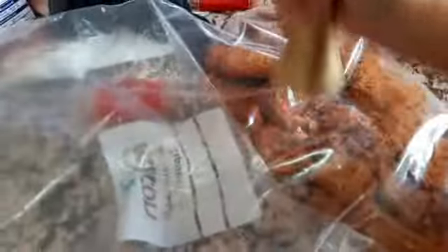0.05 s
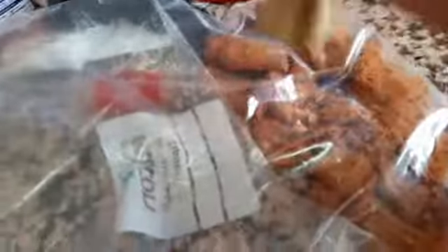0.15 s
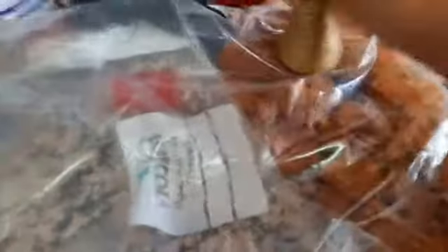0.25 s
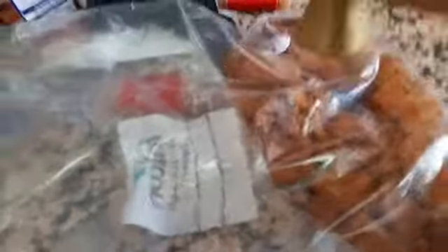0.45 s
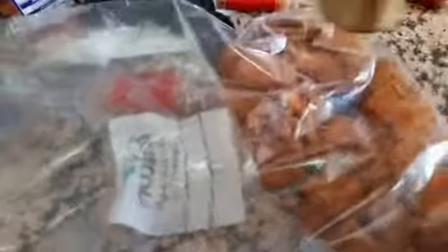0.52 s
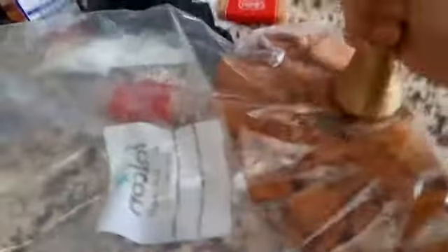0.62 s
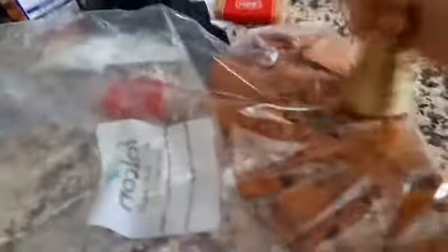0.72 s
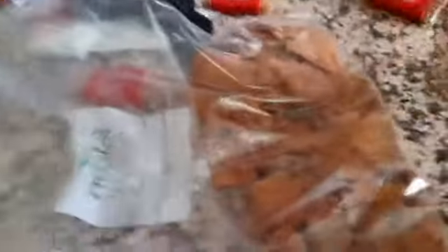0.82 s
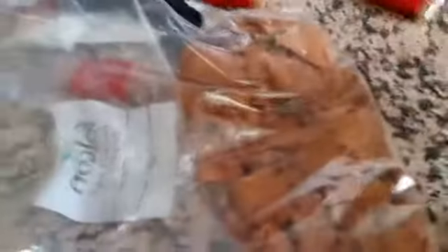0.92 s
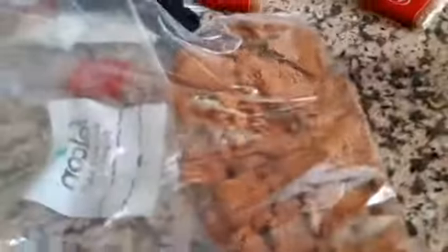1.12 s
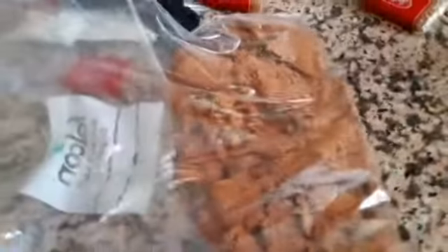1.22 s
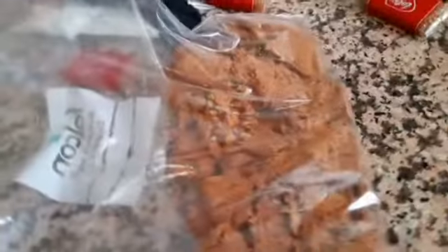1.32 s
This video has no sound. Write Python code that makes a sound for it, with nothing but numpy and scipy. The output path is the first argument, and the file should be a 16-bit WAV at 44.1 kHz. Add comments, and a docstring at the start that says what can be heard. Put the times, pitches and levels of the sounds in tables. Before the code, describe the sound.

Two quick crunching thuds sound close up as a wooden pestle breaks bagged biscuits on a kitchen counter. The plastic rustles softly after each hit and settles into faint ticks, with slight room echo and a low hum.

```python
"""A wooden pestle pounds biscuits in a plastic bag on a kitchen counter, twice.
Each blow is a swelling crunch of tiny fractures and a few hard snaps, both ringing the wood,
then the thud of the counter's low modes. The bag crinkles as its creases flip and it relaxes.
A small kitchen echoes and drones behind it."""
import sys
import numpy as np
from scipy import signal
from scipy.fft import rfft, irfft
from scipy.io import wavfile

SR = 44100
rng = np.random.default_rng(int(sys.argv[2]) if len(sys.argv) > 2 else 0)


def unload_audio(sound):
    """Save the sound as a 16-bit wav file, at the path given as the first command line argument."""
    columns = np.transpose(np.atleast_2d(sound))
    # keep every value between -1 and 1, then stretch to whole-number steps
    steps = np.round(np.clip(columns, -1, 1) * 32767)
    wavfile.write(sys.argv[1], SR, steps.astype(np.int16))


N = 59535
T, HZ = np.arange(N) / SR, np.fft.rfftfreq(2 * N, 1 / SR)

# pestle and worktop modes: pitch_hz, level_db, t60_s
WOOD_MODES = [(213, -18, 0.15), (407, -24.5, 0.07), (590, -19, 0.048), (836, -21, 0.042),
              (954, -13.5, 0.056), (1403.5, -31, 0.045), (1758, -15.5, 0.017), (1824, -18.5, 0.029),
              (1970, -25, .07), (2067, -13.5, 0.039), (2876, -23.5, 0.077), (3306, -22, 0.086)]
# plastic bag spectrum: freq_hz, density_db
BAG_SPECTRUM = [(200, -14.5), (800, 4), (1400, 0), (2300, 3), (3300, -2), (4500, -5), (6500, -9.5),
                (9000, -11.5), (13000, -10), (14500, -13), (16000, -17)]


def crunches(grains_per_s=3500, spread_db=5, swell_db=31, swell_power=2.44, release_db_per_s=997):
    """Fractures swell as the pestle sinks in, die once it stops, and ring the wood."""
    # pestle blows: peak_s, crush_s, level_db, treble_db, treble_pan_db, wood_db
    blows = [(.226, 0.02, -21, 1, 4, -8.5), (.594, 0.015, -25, 4.5, 14.5, -8)]
    # breaking biscuit spectrum: freq_hz, density_db
    spectrum = [(100, -6), (200, 4), (400, 3), (650, -1.5), (1000, 1), (1900, 2), (2700, -5.5), (4200, -8),
                (6000, -6.5), (9000, -10), (12000, -6.5), (16000, -13)]
    # left-right likeness: freq_hz, correlation
    likeness = [(100, .99), (300, 0.98), (600, 0.41), (1000, 0.54), (1800, 0.45), (3500, 0.055),
                (14000, 0.063)]
    wood = ring(WOOD_MODES, 0)
    wood /= np.linalg.norm(wood)
    pan_band = np.clip((HZ - 6500) / 3000, 0, 1)
    out = np.zeros((2, N))
    for peak_s, crush_s, level_db, treble_db, treble_pan_db, wood_db in blows:
        rise_db = -swell_db * np.clip((peak_s - T) / crush_s, 0, 2) ** swell_power
        fall_db = -release_db_per_s * np.maximum(T - peak_s, 0)
        envelope = amp(level_db + rise_db + fall_db) * (T > peak_s - crush_s)
        fractures = correlate(grains(grains_per_s, spread_db) * envelope, likeness)
        ringing = signal.fftconvolve(fractures, wood[None], axes=1)[:, :N]
        biscuit = colour(fractures, curve(spectrum) + shelf_db(treble_db))
        out += equalise(biscuit + amp(wood_db) * ringing, stereo_db(treble_pan_db * pan_band))
    return out


def snaps(t60_cycles=8.2, tick_db=-5.5, tick_decay_s=.0005):
    """Biscuits snap and one piece falls: short pitched cracks with a sharp tick ring the wood."""
    # cracks: start_s, level_db, pitch_hz, wood_db
    cracks = [(0.2155, -27, 1780, -20), (.2216, -18, 1160, -6), (.2266, -10.5, 1560, -9),
              (.2297, -15.5, 2350, -2), (.5948, -14.5, 2170, -12.5), (.6005, -20, 1960, -3),
              (0.708, -30.5, 2530, -7)]
    # crack edge spectrum: freq_hz, density_db
    tick_spectrum = [(300, -3), (1000, 0.5), (3000, -1.5), (5500, -7.5), (9000, -15), (16000, -12.5)]
    out = np.zeros((2, N))
    for start_s, level_db, pitch_hz, wood_db in cracks:
        crack = ring([(pitch_hz, 0, t60_cycles / pitch_hz)], start_s)
        tick = amp(tick_db) * colour(burst(start_s, tick_decay_s), curve(tick_spectrum))
        wood = amp(wood_db) * ring(WOOD_MODES, start_s)
        out += amp(level_db) * (crack + tick + wood)
    return out


def thuds(rise_s=.015, knock_hz=300.4, knock_t60_s=.16):
    """Soft pushes knock on the worktop and slowly rock the heavy counter; a longer push is duller."""
    # counter jolts: start_s, swing_db, push_s, knock_db
    jolts = [(.001, -23, 0.0029, -61), (0.2307, -5.5, 0.0011, -30.5), (0.599, -4.5, 0.01, -28.5),
             (0.668, -19.5, 0.0025, -40)]
    # counter and cabinet modes: pitch_hz, level_db, t60_s
    counter_modes = [(51.04, -24.5, 0.62), (70.5, 5, 0.055), (93, -14.5, .2), (109.9, -6.5, 0.18),
                     (122.2, -20, 0.53), (296.6, 3, 0.041)]
    out = np.zeros((2, N))
    for start_s, swing_db, push_s, knock_db in jolts:
        push = np.sin(np.pi * np.minimum(T / push_s, 1)) ** 2
        onset = 1 - np.exp(-np.maximum(T - start_s, 0) / rise_s)
        swing = signal.fftconvolve(ring(counter_modes, start_s) * onset, push / push.sum())[:N]
        knock = ring([(knock_hz, knock_db, knock_t60_s)], start_s)
        out -= amp(swing_db) * swing + knock
    return out


def creases():
    """Creases of the bag flip one by one, each a brief noise burst."""
    # crease flips: start_s, level_db, treble_db, decay_s, pan_db
    flips = [(0.013, -38.5, -38, 0.0023, 6), (0.1, -42, 3, 0.0024, 4), (.126, -46.5, -25, 0.0018, -1),
             (0.307, -40, -8, 0.0055, 1), (0.5894, -17.5, 19, 0.0016, 1.5), (0.678, -42, 10, 0.00056, 9),
             (0.7054, -41, -6, 0.0018, -1), (0.841, -57, 15, .002, 3), (1.033, -50.5, -27, 0.0038, -1),
             (1.107, -56, 21, 0.0015, -0.5), (1.246, -59, 4, .002, -4.5), (1.26, -60, 26, 0.0027, 9),
             (1.313, -57, 16, .001, 3)]
    out = np.zeros((2, N))
    for start_s, level_db, treble_db, decay_s, pan_db in flips:
        click = colour(burst(start_s, decay_s), curve(BAG_SPECTRUM) + shelf_db(treble_db))
        out += amp(level_db + stereo_db(pan_db)) * click
    return out


def rustles(grains_per_s=3600, spread_db=2.5):
    """Plastic and crumbs shift in swells of fine clicks."""
    # bag movements: peak_s, rise_s, fall_s, level_db, treble_db
    shifts = [(.005, 0.014, 0.021, -49, 3), (.06, .02, 0.14, -64, 5), (0.299, 0.052, 0.047, -45, 8.5),
              (.41, .03, 0.033, -65.5, 14.5), (.5, 0.22, 0.099, -63.5, 24), (.635, 0.029, 0.022, -49.5, 13),
              (.68, 0.062, 0.041, -45, 5), (.93, 0.11, 0.23, -66, 4.5), (1.29, 0.037, 0.075, -71.5, 13)]
    out = np.zeros((2, N))
    for peak_s, rise_s, fall_s, level_db, treble_db in shifts:
        swell = np.exp(-(np.minimum(T - peak_s, 0) / rise_s) ** 2 - np.maximum(T - peak_s, 0) / fall_s)
        clicks = grains(grains_per_s, spread_db) * swell
        out += amp(level_db) * colour(clicks, curve(BAG_SPECTRUM) + shelf_db(treble_db))
    return out


def kitchen_echo(x, delay_s=.002, rise_s=.0013):
    """Dense reflections from near walls, each band dying at its own rate."""
    # room decay: freq_hz, t60_s
    decay_times = [(100, 0.16), (400, 0.63), (2000, 0.29), (6000, 0.12), (15000, 0.66)]
    # echo strength: freq_hz, level_db
    echo_levels = [(50, -40), (150, -15.5), (400, -4.5), (2000, -14), (6000, -9.5), (15000, -29)]
    hz, t, bands = signal.stft(rng.standard_normal((2, N)), SR, nperseg=256)
    t60_s = curve(decay_times, hz)[:, None]
    bands *= amp(curve(echo_levels, hz)[:, None] - 60 * t / t60_s)
    bands *= np.sqrt(2 * np.log(1000) / (t60_s * SR))  # energy independent of decay time
    onset = np.clip((T - delay_s) / rise_s, 0, 1)
    tail = signal.istft(bands, SR, nperseg=256)[1][:, :N] * onset
    return signal.fftconvolve(x, tail, axes=1)[:, :N]


def drone(level_db=-47.5):
    """Steady low room noise with two humming resonances."""
    # room noise spectrum: freq_hz, density_db
    spectrum = [(30, -17.5), (60, -18.5), (90, -3), (135, 0), (170, -12.5), (240, -14.5), (320, -7.5),
                (560, -14.5), (800, -23), (1200, -25), (2500, -35.5), (4500, -46), (7000, -49),
                (12500, -58.5), (16000, -66.5)]
    # left-right likeness: freq_hz, correlation
    likeness = [(60, 1), (150, 0.97), (330, 0.86), (700, 0.33), (1500, 0), (15000, 0.17)]
    # room resonances: pitch_hz, half_width_hz, hum_db
    hums = [(133.5, 7.5, -53.5), (309.5, 17, -61.5)]

    def noise(shape_db):
        shaped = equalise(rng.standard_normal((2, 2 * N)), shape_db)
        return unit_rms(correlate(shaped, likeness))

    out = amp(level_db) * noise(curve(spectrum))
    for pitch_hz, half_width_hz, hum_db in hums:
        resonance_db = -20 * np.log10(1 + ((HZ - pitch_hz) / half_width_hz) ** 2)
        out += amp(hum_db) * noise(resonance_db)
    return out


def grains(per_s, spread_db):
    """Two random trains of clicks of uneven size."""
    size = amp(spread_db * np.minimum(rng.exponential(1, (2, N)), 3))
    sign = rng.choice([-1., 1.], (2, N))
    fires = rng.random((2, N)) < per_s / SR
    return unit_rms(size * sign * fires)


def burst(start_s, decay_s):
    """Decaying stereo white noise."""
    return rng.standard_normal((2, N)) * (T >= start_s) * np.exp(-abs(T - start_s) / decay_s)


def ring(modes, start_s):
    """Damped modes struck together."""
    t = np.maximum(T - start_s, 0)
    return sum(amp(db - 60 * t / t60_s) * np.sin(2 * np.pi * hz * t) for hz, db, t60_s in modes)


def amp(db):
    """Decibels to gain."""
    return 10 ** (np.asarray(db) / 20)


def unit_rms(x):
    """Scale to rms 1."""
    return x / np.sqrt(np.mean(x ** 2) + 1e-20)


def curve(points, hz=HZ):
    """Interpolate a table over log frequency."""
    freq_hz, value = np.transpose(points)
    return np.interp(np.log(hz + 1), np.log(freq_hz), value)


def shelf_db(treble_db, corner_hz=4500):
    """Shelf from 0 in the bass to treble_db at the top."""
    return treble_db * HZ ** 2 / (HZ ** 2 + corner_hz ** 2)


def stereo_db(pan_db):
    """Split a left-minus-right level over both channels."""
    return np.outer([.5, -.5], pan_db)


def equalise(x, gain_db):
    """Zero-phase filter."""
    return irfft(rfft(x, 2 * N) * amp(gain_db))[:, :N]


def colour(x, shape_db):
    """Minimum-phase filter of unit power."""
    log_gain = np.log(unit_rms(amp(shape_db)) + 1e-6)
    mirrored = np.r_[log_gain, log_gain[-2:0:-1]]
    response = np.exp(np.conj(signal.hilbert(mirrored)))[:N + 1]
    return irfft(rfft(x, 2 * N) * response)[..., :N]


def correlate(pair, likeness):
    """Blend two independent signals into a partly alike left and right."""
    spectra = rfft(pair, 2 * N)
    angle = np.arcsin(np.clip(curve(likeness), -1, 1)) / 2
    return irfft(spectra * np.cos(angle) + spectra[::-1] * np.sin(angle))[:, :N]


def scene():
    """Bag and blows in the kitchen."""
    direct = creases() + rustles() + snaps() + crunches() + thuds()
    return direct + kitchen_echo(direct) + drone()


def record(dry, low_cut_hz=36, high_cut_hz=15900):
    """Microphone colour, balance, bass roll-off and band limit."""
    # microphone peaks and dips: centre_hz, width_hz, gain_db
    mic_bands = [(4360, 310, -1.5), (5240, 520, 0.5), (6020, 220, -3.5), (7750, 270, -1.5),
                 (8800, 630, 4.5)]
    # channel balance: freq_hz, pan_db
    balance = [(100, 0), (350, -0.5), (650, -4), (1300, 0), (4000, -2), (10000, 0)]
    tint_db = sum(db * np.exp(-((HZ - hz) / width_hz) ** 2) for hz, width_hz, db in mic_bands)
    x = equalise(dry, tint_db + stereo_db(curve(balance)))
    x = signal.sosfilt(signal.butter(4, low_cut_hz, "high", fs=SR, output="sos"), x)
    lowpass = signal.firwin(511, high_cut_hz, window=("kaiser", 9), fs=SR)
    return signal.oaconvolve(x, lowpass[None], "same")


dry = scene()
out = record(dry)
unload_audio(out)
```